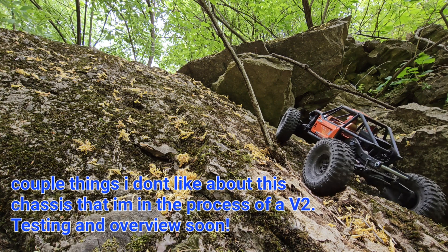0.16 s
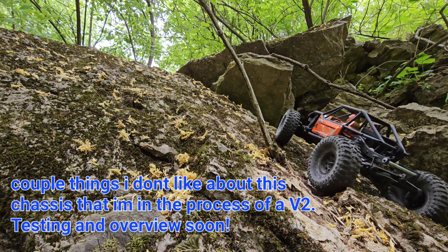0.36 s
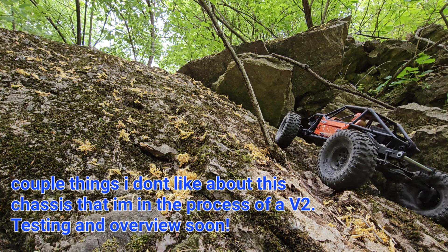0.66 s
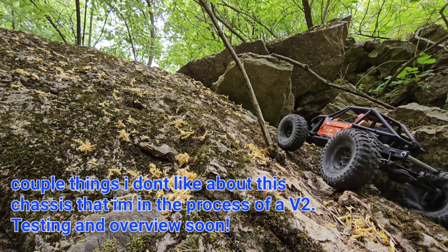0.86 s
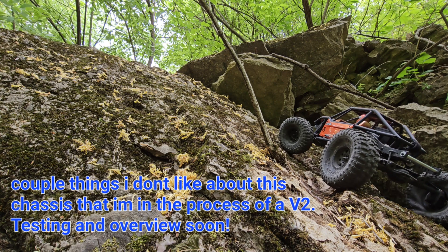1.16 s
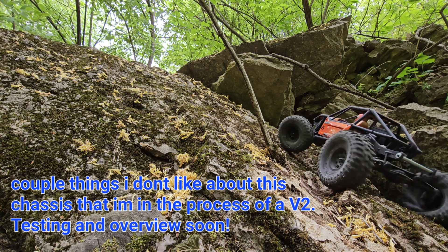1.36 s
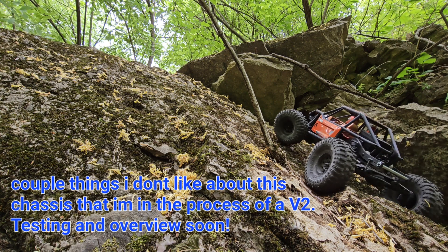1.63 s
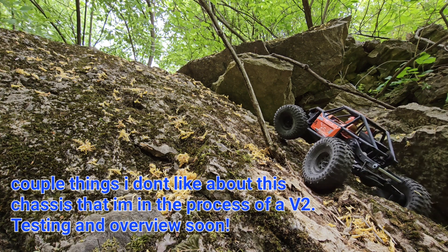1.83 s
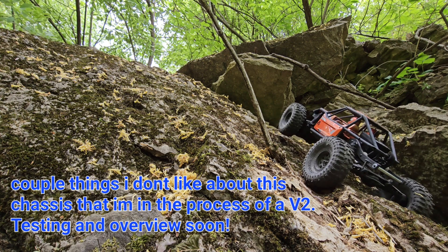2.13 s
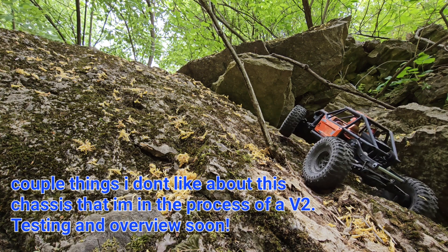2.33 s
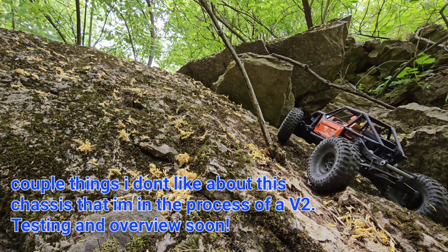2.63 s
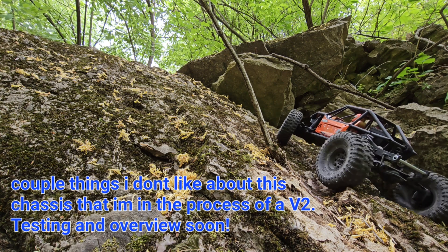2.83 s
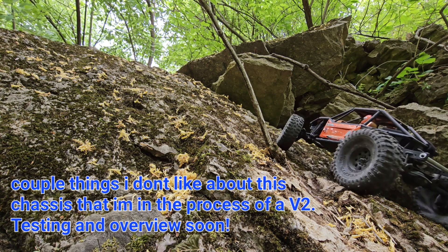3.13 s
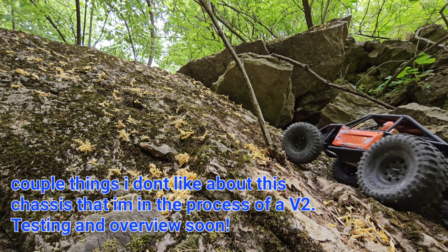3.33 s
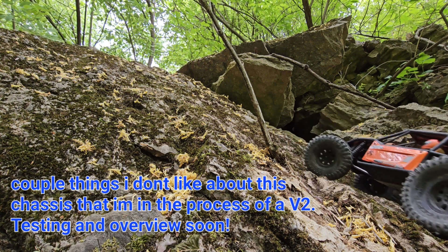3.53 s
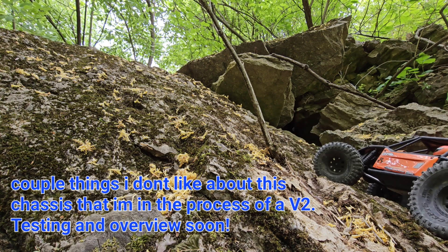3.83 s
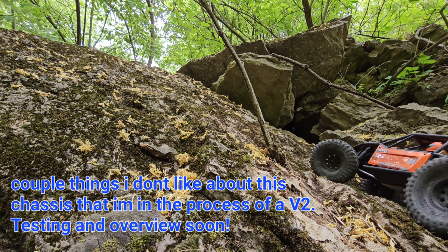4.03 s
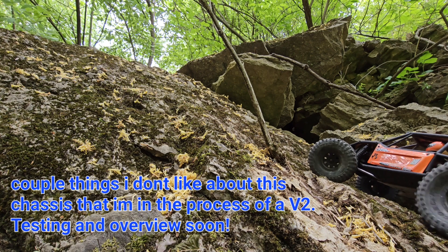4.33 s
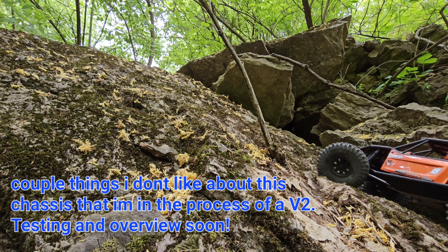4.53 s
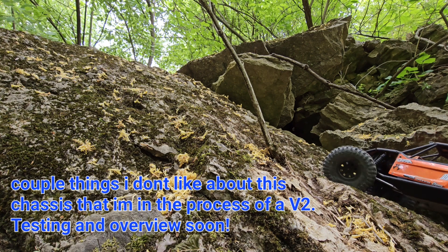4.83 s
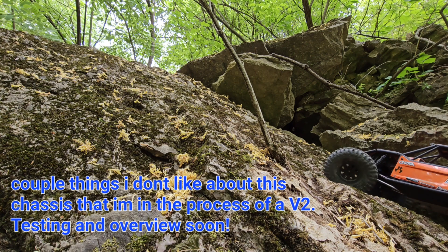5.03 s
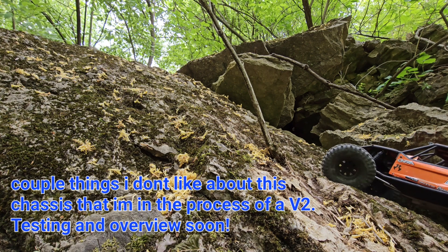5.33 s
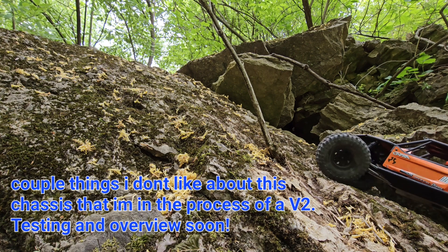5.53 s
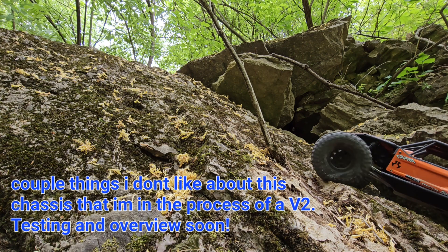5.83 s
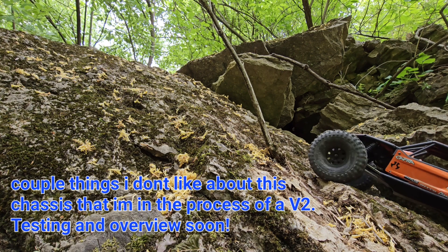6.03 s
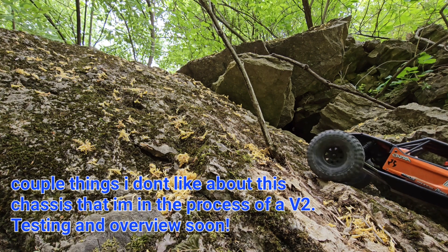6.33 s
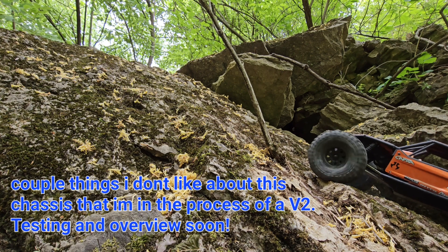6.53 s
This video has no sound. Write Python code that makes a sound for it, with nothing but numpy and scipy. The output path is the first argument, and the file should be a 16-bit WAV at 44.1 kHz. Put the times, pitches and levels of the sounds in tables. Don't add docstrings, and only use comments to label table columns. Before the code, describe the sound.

Outdoors under trees, close to a boulder, a stereo microphone hears sparse dry clicks and high zippy steering whirs from a toy truck over soft distant rumble. After about three seconds rubber lugs begin to slip and thud, dragging gritty scuffs and crisp leaf rustle. Bouts come faster and stronger, with tiny rubber squeaks, until the wheels break free, the small motor whines up and something snaps loudly.

```python
import sys
import numpy as np
from scipy import signal
from scipy.fft import rfft, irfft, next_fast_len
from scipy.io import wavfile
from scipy.ndimage import uniform_filter1d

SR = 44100
rng = np.random.default_rng(int(sys.argv[2]) if len(sys.argv) > 2 else 0)


def invert_db(level):
    return 10 ** (np.asarray(level, dtype=float) / 20)


def log_audio(samples):
    frames = np.atleast_2d(samples).T
    limited = np.clip(frames, -1, 1)
    pcm = np.round(limited * 32767).astype(np.int16)
    wavfile.write(sys.argv[1], SR, pcm)


N = 294058

# frequency in Hz, level in dB per Hz.
GRIT_COLOUR = [(600, -15.5), (800, -6), (950, -3.5), (1100, 1.5), (1300, -1), (1650, -2), (1900, -4.5),
               (2300, -7), (3000, -5.5), (4000, -7), (5500, -22.5), (8000, -38)]


def evened(x):
    return x / np.sqrt(np.mean(x ** 2) + 1e-20)


def read(points, hz):
    f, value = np.transpose(points)
    return np.interp(np.log(hz + 1), np.log(f + 1), value)


def follow(rows):
    s, *columns = np.transpose(rows)
    return [np.interp(np.arange(N) / SR, s, c) for c in columns]


def add(mix, s, sound):
    part = mix[round(s * SR):][:len(sound)]
    part += sound[:len(part)]


def colour(x, points, size=4096):
    log_gain = np.log(invert_db(read(points, abs(np.fft.fftfreq(size, 1 / SR)))))
    taps = np.fft.ifft(np.exp(np.conj(signal.hilbert(log_gain)))).real
    return signal.oaconvolve(x, taps[:size // 2])[:len(x)]


def resonate(x, hz, width_hz):
    turn = np.exp(2j * np.pi * np.cumsum(hz * np.ones(x.shape[-1])) / SR)
    r = np.exp(-np.pi * width_hz / SR)
    return 2 * (turn * signal.lfilter([1 - r], [1, -r], x * turn.conj())).real


def wobble(seconds, size=N):
    span = max(int(seconds * SR), 1)
    return evened(uniform_filter1d(uniform_filter1d(rng.standard_normal(size), span), span))


def partly_alike(a, b, same):
    return same * a + np.sqrt(1 - same ** 2) * b


def pair(points, same):
    size = next_fast_len(N)
    hz = np.fft.rfftfreq(size, 1 / SR)
    a, b = rfft(rng.standard_normal((2, size)))
    alike = np.clip(read(same, hz), 0, 1)
    spectra = np.array([a, partly_alike(a, b, alike)]) * invert_db(read(points, hz))
    return evened(irfft(spectra, size)[:, :N])


def grains(points, per_s, spread_db, smooth, same):
    size = invert_db(spread_db * np.minimum(rng.exponential(1, (2, N)), 4)) * rng.choice([-1., 1.], (2, N))
    clicks = evened(size * (rng.random((2, N)) < per_s / SR))
    a, b = clicks + smooth * rng.standard_normal((2, N))
    return evened(np.array([colour(a, points), colour(partly_alike(a, b, same), points)]))


def narrow_hisses(rows):
    out = np.zeros(N)
    for start, end, hz, width_hz, db in rows:
        size = round((end - start) * SR)
        hiss = resonate(resonate(rng.standard_normal(size), hz, width_hz), hz, width_hz)
        flicker = invert_db(db + 3 * wobble(0.005, size))
        add(out, start, flicker * evened(hiss) * signal.windows.tukey(size, .3))
    return out


def woods():
    # frequency in Hz, level in dB per Hz.
    air_colour = [(100, 0), (150, -6.5), (260, -9.5), (430, -16), (900, -19.5), (1200, -19), (1800, -24),
                  (3000, -22), (4500, -24), (5200, -30.5), (7300, -29), (9000, -41.5), (10200, -41),
                  (11500, -47), (15500, -32.5)]
    # frequency in Hz, likeness from 0 to 1.
    air_same = [(100, 0.73), (200, 1), (350, 0.31), (700, 0.075), (2000, 0.026)]
    # frequency in Hz, level in dB per Hz.
    rumble = [(15, -1), (30, -3), (40, 1), (50, -0.5), (80, 5), (99, 14.5), (112, 2.5), (135, -6),
              (220, -48)]
    # middle in seconds, length in seconds, level in dB.
    gust_rows = [(0.377, 0.14, -54.5), (0.743, 0.088, -55.5), (1.31, .5, -91), (2.31, 0.13, -54.5),
                 (2.59, 0.35, -66.5), (3.456, 0.81, -62), (4.776, 0.31, -68), (5.23, 0.14, -75),
                 (5.88, 0.14, -60), (6.41, 0.29, -63)]
    # time in seconds, hum in dB.
    hum_rows = [(0, -50), (.6, -55), (.78, -61.5), (.95, -58), (2.1, -57), (2.5, -51.5), (3.3, -54.5),
                (3.8, -57.5), (4.8, -66.5), (5.5, -56.5), (6.05, -60.5), (6.67, -57.5)]
    air_db, calm_db = -65, -61
    bump_s, bump_hz, bump_db, bump_width_s = 2.2625, 55.4, -38, 0.0077
    t = np.arange(N) / SR
    hum_db = follow(hum_rows)[0]
    gusts = invert_db(calm_db) + sum(invert_db(db) * np.exp(-(2 * (t - s) / length) ** 2) for s, length, db in gust_rows)
    low = pair(rumble, [(20, 1.0), (200, 0.95)]) * invert_db(np.array([[-2.2], [2.2]]))
    deep = signal.sosfiltfilt(signal.butter(4, 72, fs=SR, output="sos"), low)
    engine = evened(resonate(rng.standard_normal(N), 98 + 1.5 * wobble(.3), 2))
    hum = invert_db(hum_db) * (0.43 * evened(low - deep) + 0.41 * engine)
    air = invert_db(air_db + 0.89 * wobble(0.0085)) * pair(air_colour, air_same)
    puff_shape = np.exp(-((t - bump_s) / bump_width_s) ** 2 / 2)
    puff = invert_db(bump_db) * np.sin(2 * np.pi * bump_hz * (t - bump_s)) * puff_shape
    return air + puff + gusts * evened(deep) + hum


def electronics():
    # start in seconds, end in seconds, pitch in Hz, width in Hz, level in dB.
    idle = [(.76, 1.66, 7150, 190, -80), (.13, .45, 3000, 260, -76), (2.62, 3.05, 2980, 220, -77),
            (1.43, 1.6, 2950, 500, -63), (1.74, 1.9, 3250, 450, -73), (.04, .45, 7180, 150, -84),
            (.07, .19, 2150, 90, -81), (2.76, 3.0, 6450, 300, -82), (1.48, 1.6, 6200, 300, -71),
            (1.48, 1.62, 7500, 350, -70)]
    return narrow_hisses(idle)


def servo():
    # time in seconds, gear tooth rate in Hz.
    moves = [
        [(.805, 975), (.845, 2140), (.865, 2130), (.885, 1500)],
        [(.905, 1050), (.953, 1800), (.978, 1790), (1.025, 1450), (1.06, 1384), (1.11, 900)],
        [(1.43, 890), (1.62, 900)],
        [(2.02, 1050), (2.045, 1550), (2.065, 2200), (2.085, 2450), (2.11, 2330), (2.143, 2370)],
        [(2.13, 1560), (2.15, 1640), (2.178, 2150), (2.19, 2130), (2.21, 1500)],
        [(2.25, 900), (2.282, 1095), (2.32, 1030), (2.35, 1040)],
        [(2.345, 1150), (2.38, 1650), (2.395, 1660), (2.415, 1560), (2.46, 1050)],
        [(3.32, 2010), (3.357, 2320)],
        [(3.35, 1650), (3.375, 2350), (3.39, 2620)],
        [(3.362, 1050), (3.383, 1450), (3.402, 1850), (3.425, 2100), (3.45, 2210), (3.465, 2170), (3.49, 1950)],
        [(5.955, 1700), (5.985, 1610), (6.015, 1420), (6.068, 1310)],
    ]
    # whine in dB, brush hiss in dB, boost of odd multiples in dB
    # (which gear carries the load), extra bite while speeding up in dB.
    loads = [(-61.5, -57, 2, -2), (-62, -61, 0, 2), (-92, -61, 0, 0), (-59, -54, -5, 0), (-57, -55, -7, 0),
             (-66, -63, -1, 0), (-62.5, -62, -2, 2), (-59, -60, -11, 0), (-56, -63, 6, 0),
             (-56, -57, -20, 9), (-57, -61, 0, 0)]
    # frequency in Hz, level in dB.
    teeth = [(1500, -22), (2200, -3), (3000, 3), (4800, 0), (5400, -1), (5900, -11), (6500, -5), (6900, -6),
             (7300, 5), (7750, -5), (8200, 1), (8800, 0), (9300, -24), (11500, -40)]
    # frequency in Hz, level in dB per Hz.
    case = [(1500, -22), (2600, -11), (3400, -4), (4700, 0), (5200, -8), (5700, -30), (6400, -9),
            (7300, -3), (8300, -2), (9300, -6), (10200, -24), (11500, -17), (15800, -19)]
    # pitch in Hz, width in Hz, level in dB.
    case_rings = [(7300, 300, 0), (8150, 250, 1), (9200, 200, -2)]
    edge_s, coast_s = .02, .05
    out = np.zeros(N)
    for rows, (whine_db, hiss_db, odd_db, push_db) in zip(moves, loads):
        s, hz = np.transpose(rows)
        t = np.arange(s[0], s[-1], 1 / SR)
        hz = uniform_filter1d(np.interp(t, s, hz), 500, mode="nearest")
        speed = hz / hz.max()

        turns = np.cumsum(hz * (1 + .011 * wobble(.0025, len(t)))) / SR
        stack = np.zeros(len(t))
        for k in range(1, 9):
            unsteady_db = (2.5 + .5 * k) * wobble(.005, len(t))
            level_db = read(teeth, k * hz) + odd_db * (k % 2) - 1.6 * k + unsteady_db
            stack += invert_db(level_db) * np.sin(2 * np.pi * k * turns)
        edges = np.clip(np.minimum(t - s[0], s[-1] - t) / edge_s, 0, 1)
        push = invert_db(push_db * np.tanh(np.gradient(np.log(hz)) * SR / 8))
        add(out, s[0], edges * invert_db(whine_db + 1) * speed ** 1.2 * evened(stack) * push)

        hiss = colour(rng.standard_normal(len(t) + round(coast_s * SR)), case)
        hiss = hiss + sum(invert_db(db) * resonate(hiss, ring_hz, width_hz) for ring_hz, width_hz, db in case_rings)
        start_up = speed * np.clip((t - s[0] + .005) / .035, 0, 1)
        after = np.arange(len(hiss) - len(t)) / SR
        coast = np.r_[start_up, speed[-1] * invert_db(-30 * after / coast_s)]
        roughness = invert_db(hiss_db - 5.0 + 0.65 * wobble(0.0021, len(hiss)))
        add(out, s[0], roughness * uniform_filter1d(coast, 400) ** 1.8 * evened(hiss))
    return out


def drive_motor():
    # time in seconds, pitch in Hz, level in dB,
    # level of the second multiple in dB.
    bursts = [
        [(6.33, 824, -66, -60), (6.35, 900, -62, -48), (6.39, 1180, -31, -49), (6.42, 1290, -50, -62),
         (6.45, 1383, -28, -43), (6.47, 1470, -46, -55), (6.49, 1530, -75, -70)],
        [(6.485, 750, -67, -65), (6.51, 980, -26, -63), (6.535, 1090, -43, -63), (6.55, 1110, -62, -65)],
        [(6.55, 920, -65, -60), (6.57, 1030, -44, -54), (6.605, 1205, -31, -44), (6.625, 1310, -65, -56)],
    ]
    out = np.zeros(N)
    for rows in bursts:
        s, *columns = np.transpose(rows)
        t = np.arange(s[0], s[-1], 1 / SR)
        hz, db, second_db = [np.interp(t, s, c) for c in columns]
        noise = rng.standard_normal(len(t))
        whine = invert_db(db) * evened(resonate(noise, hz, 47))
        add(out, s[0], whine + invert_db(second_db) * evened(resonate(noise, 2 * hz, 90)))
    return out


def squeaks():
    # start in seconds, end in seconds, pitch in Hz, width in Hz, level in dB.
    squeak_rows = [(3.625, 3.675, 1730, 340, -53), (3.7, 3.728, 1870, 300, -57),
                   (3.545, 3.565, 1700, 250, -77), (5.325, 5.36, 2050, 340, -48.5),
                   (5.79, 5.83, 2350, 100, -54), (1.95, 1.975, 5300, 150, -77),
                   (1.96, 1.995, 4900, 150, -83), (3.115, 3.17, 7000, 150, -74),
                   (6.36, 6.475, 11300, 1700, -49), (6.38, 6.475, 12700, 500, -53.5),
                   (6.57, 6.625, 11500, 650, -56), (6.57, 6.62, 12700, 500, -56),
                   (6.4, 6.45, 546, 160, -45), (6.56, 6.62, 562, 180, -36.5), (6.29, 6.315, 750, 380, -46)]
    return narrow_hisses(squeak_rows)


def snaps():
    # time in seconds, peak in dB, brightness in dB.
    snap_rows = [(0.097, -40, -19), (.11, -37, -22), (.21, -43, -15), (0.248, -30.5, -33),
                 (0.272, -40, -25), (0.442, -39, -37), (0.4783, -39, -39), (0.5045, -38, -34),
                 (0.563, -30, -31), (.572, -36, -15), (1.2558, -44, -40), (1.422, -37, -20),
                 (1.4505, -60, -4), (1.877, -51, 10), (1.95, -38.5, -18), (2.139, -28, -18),
                 (2.5336, -52, -27), (2.644, -36.5, -29), (2.709, -43, -25), (2.81, -43, -25),
                 (2.855, -39.5, -30), (2.882, -42, -22), (2.964, -56, -23), (3.088, -56, -23),
                 (2.9275, -33.5, -38), (3.038, -41, -35), (3.7075, -46, -20), (3.742, -27, -11),
                 (3.9064, -65, -25), (4.8595, -31, -25), (4.9725, -28, -25), (5.3288, -25, -1),
                 (5.6594, -24, -9), (5.6894, -31, 10), (5.8755, -27, -27), (6.106, -27, -15),
                 (6.301, -29, -24), (6.4054, -29, 5), (6.5483, -3, -5.5)]
    # frequency in Hz, level in dB.
    wood_colour = [(250, -41), (900, -20), (3000, 6), (4800, 0), (6500, 2), (16000, -51.5)]
    # frequency in Hz, level in dB per Hz.
    fizz_colour = [(3000, -24), (5500, -3), (8000, -2), (10000, -7), (12000, -4), (16000, -6)]
    # pitch in Hz, width in Hz, level in dB.
    shell_rings = [(2960, 150, 0), (3600, 150, -1), (4280, 180, -2), (5450, 140, -5), (6250, 160, -5),
                   (7500, 200, -6), (8200, 200, -6)]
    stands_until_s = 3.2
    out, t = np.zeros(N), np.arange(1500) / SR
    fade = np.minimum(t / .0018, 1) * (invert_db(-60 * t / .018) + .12 * invert_db(-60 * t / .05))
    for s, db, bright_db in snap_rows:
        burst = rng.standard_normal(len(t)) * fade
        wood, fizz = colour(burst, wood_colour), colour(burst, fizz_colour)
        if s < stands_until_s:
            fizz = colour(fizz, [(8500, 0), (10500, -12)])
            shell = sum(invert_db(ring_db + 3 * rng.standard_normal()) * resonate(burst, hz, width_hz)
                        for hz, width_hz, ring_db in shell_rings)
            wood = .5 * evened(wood) + .3 * evened(colour(burst, GRIT_COLOUR)) + evened(shell)
        crack = wood / abs(wood).max() + invert_db(bright_db + 1.5) * fizz / abs(fizz).max()
        add(out, s + 0.00081, invert_db(db - 14.0) * crack)
    return out


def layers(db, dry_db):
    over_db = db + 50
    grit_db = -53.5 + 0.78 * over_db + 0.34 * dry_db
    leaf_db = -64.5 + 0.99 * over_db + dry_db
    return invert_db(2 * np.array([db, grit_db, leaf_db]))


def tread():
    # start in seconds, length in seconds, effort in dB, dryness of the ground in dB.
    bouts = [(0.36, 0.063, -75, -4), (0.4, 0.08, -67, -2), (0.785, 0.3, -71, -23), (1.415, 0.14, -56.5, 4),
             (1.693, 0.098, -70.5, -4), (1.761, 0.18, -64.5, -3), (2.087, 0.12, -72.5, -14),
             (2.362, .1, -97, 13), (3.173, 0.2, -65, 4.5), (3.345, 0.3, -49, -25),
             (3.347, 0.13, -69.5, 25.5), (3.48, 0.13, -53.5, 3), (3.618, 0.036, -49.5, 2.5),
             (3.681, 0.061, -65.5, 13), (3.811, 0.021, -53, -3), (3.899, 0.016, -56.5, 3.5),
             (4.033, 0.06, -63.5, -8), (4.08, .03, -53, 1.5), (4.103, 0.067, -50, 2.5),
             (4.188, 0.18, -52.5, -0.5), (4.328, 0.33, -49, -0.5), (4.665, 0.095, -47, -3.5),
             (4.802, 0.056, -47.5, -4.5), (4.944, 0.042, -46, -5.5), (5.05, 0.37, -52, 0.5),
             (5.354, 0.29, -49, 1.5), (5.619, 0.078, -43.5, 7.5), (5.727, 0.17, -46, 2),
             (5.895, 0.09, -46.5, 5), (6.053, 0.23, -50, -0.5), (6.165, 0.099, -47, 1),
             (6.291, 0.092, -42.5, 6), (6.38, 0.13, -38, 4.5), (6.5, 0.12, -37.5, 2), (6.64, .03, -43, -3)]
    # time in seconds, effort in dB, dryness in dB.
    creep = [(0, -114, 19), (1.4, -102, -34), (2.5, -76.5, -13), (3.1, -74.5, 3), (4.0, -68, 2.5),
             (5.0, -56, 0), (6.05, -62.5, 7.5), (6.67, -52, 15)]
    let_go_db_per_s = 319
    t = np.arange(3000 + SR // 2) / SR
    power = layers(*follow(creep)).T.copy()
    for s, length, db, dry_db in bouts:
        bite = np.clip(t / (0.018 + 0.15 * length), 1e-3, 1)
        let_go_db = let_go_db_per_s * np.maximum(t - length, 0)
        add(power, s, layers(db + 20 * np.log10(bite) - let_go_db, dry_db).T)
    return 10 * np.log10(power.T)


def lug_knock(t, hz, crack_colour):
    pull = np.maximum(t - .0009, 0)
    snap_back = np.sin(2 * np.pi * 430 * t + .8) * (.25 + t / .0009) * np.exp(-t / .0012)
    crack = (rng.standard_normal(len(t)) + 4 * (t == 0)) * np.exp(-t / .0005)
    knock = snap_back + .5 * colour(crack, crack_colour)
    knock += .3 * np.sin(2 * np.pi * 570 * t) * invert_db(-60 * t / .03)
    knock += 0.25 * np.sin(2 * np.pi * 1700 * t) * np.exp(-t / 0.0021)
    knock -= 0.55 * np.sin(2 * np.pi * hz * pull) * invert_db(-60 * pull / 0.028)
    return knock / abs(knock).max()


def tyres():
    # time in seconds, peak in dB, pitch in Hz, scuff length in seconds.
    slips = [(0.4225, -66, 910, .005), (.44, -60, 800, .005), (0.4766, -52, 800, .005),
             (1.475, -43.5, 537, 0.088), (2.532, -48.5, 640, 0.11), (2.741, -49.5, 246, 0.0051),
             (3.275, -38, 627, 0.0076), (3.34, -41, 533, 0.034), (3.509, -37.5, 507, 0.017),
             (3.636, -41.5, 624, 0.033), (3.702, -38, 280, 0.079), (3.742, -40, 200, 0.051),
             (3.828, -60, 342, 0.058), (3.853, -41.5, 684, 0.013), (4.1, -38, 197, 0.26),
             (4.148, -41, 250, 0.054), (4.818, -35.5, 265, 0.058), (4.836, -42, 298, 0.034),
             (4.859, -27.5, 302, 0.021), (4.8964, -29, 570, 0.022), (4.9727, -28.5, 275, 0.021),
             (5, -33.5, 560, 0.012), (5.1665, -35.5, 230, 0.02), (5.4207, -28, 282, 0.03),
             (5.5595, -29, 564, 0.058), (5.7712, -31.5, 457, 0.0056), (5.8737, -32.5, 503, 0.021),
             (5.963, -34.5, 249, 0.022), (6.005, -35, 367, 0.025), (6.0833, -36, 279, 0.051),
             (6.5301, -26.5, 242, 0.024), (6.592, -29.5, 275, 0.077), (6.6035, -28, 236, 0.027)]
    # time in seconds, peak in dB.
    nicks = [(1.452, -46.5), (3.32, -43.5), (3.5237, -56), (3.5465, -50), (3.5608, -41), (3.5674, -42),
             (3.657, -41), (4.101, -48), (4.123, -46), (4.156, -42), (4.236, -40), (4.31, -59),
             (4.3728, -39), (4.3847, -41), (4.457, -37.5), (4.5254, -44), (4.552, -47), (4.572, -47),
             (4.6308, -38.5), (4.7232, -38), (4.765, -43), (5.0165, -39), (5.104, -39), (5.1301, -47),
             (5.1927, -43), (5.308, -41.5), (5.358, -46), (5.4604, -43), (5.5, -39), (5.6492, -40),
             (5.6677, -37), (5.6798, -34), (5.7025, -33.5), (5.817, -33), (5.9165, -36), (6.1633, -46),
             (6.1782, -39.5), (6.191, -51), (6.23, -34), (6.302, -38), (6.322, -43), (6.338, -41),
             (6.38, -37), (6.4033, -34), (6.411, -32), (6.424, -32), (6.4322, -40), (6.449, -31),
             (6.459, -25), (6.465, -41), (6.483, -34), (6.542, -30), (6.57, -32), (6.5789, -38),
             (6.6162, -37), (6.6571, -32.5)]
    # frequency in Hz, level in dB per Hz.
    lug_colour = [(70, -22.5), (170, -0.5), (260, 1), (360, -5.5), (560, 2), (760, -1), (950, -12.5),
                  (1500, -41.5)]
    # frequency in Hz, level in dB per Hz.
    leaf_colour = [(2500, -5.5), (4500, 3.5), (7000, 3), (9500, -2), (10600, -9.5), (11500, -4),
                   (12700, -7.5), (14000, -2), (16000, -8.5)]
    # frequency in Hz, level in dB.
    crack_colour = [(500, -20), (1000, 0), (3500, 0), (5500, -10), (9000, -45)]
    lug_db, grit_db, leaf_db = tread()
    judder = wobble(0.009)
    drag, out = np.ones(N), np.zeros(N)
    t = np.arange(6000) / SR
    loudness = invert_db(lug_db)
    booms = rng.choice((250, 577), len(nicks)) * rng.uniform(0.85, 1.11, len(nicks))
    lesser = [(s, db, hz, 0.042) for (s, db), hz in zip(nicks, booms)]
    for s, db, hz, scuff_s in list(slips) + lesser:
        scuff = np.minimum(t / .004, 1) * invert_db(db - 60 * t / max(scuff_s, .005))
        add(drag, s + .003, 0.11 * scuff / loudness[round(s * SR)])
        add(out, s + .0022, invert_db(db + 2.5) * lug_knock(t, hz, crack_colour))

    lugs = grains(lug_colour, per_s=350, spread_db=4.0, smooth=0.74, same=1.0)
    out = out + invert_db(lug_db + 0.5 + 1.2 * judder) * drag * lugs

    grit = grains(GRIT_COLOUR, per_s=1100, spread_db=3.6, smooth=0.75, same=0.65)
    hollow = 1.3 * resonate(grit, 2300 * (1 + .06 * wobble(.05)), 220)
    hollow += .4 * resonate(grit, 1400 * (1 + .1 * wobble(.04)), 150)
    pressed = np.clip((grit_db + 62) / 14, .1, 1.3)
    out += invert_db(grit_db + 3.0 + 0.89 * judder) * drag ** 1.58 * (grit + pressed * hollow)

    leaves = grains(leaf_colour, per_s=2500, spread_db=2.3, smooth=1.2, same=.2)
    out += invert_db(leaf_db + 5.5 + 1.15 * judder) * drag ** 0.35 * leaves
    return out


def ports(x, lag, right_db, wet_db, t60):
    # frequency in Hz, level in dB.
    shadow = [(80, -1.5), (200, -2), (700, -2.5), (1300, -2.5), (2400, -4.5), (4400, -4), (8000, -1.5),
              (10500, 1.5), (12000, -4), (15500, -0.5)]
    left, right = x * np.ones((2, 1))
    late = np.r_[np.zeros(lag), colour(right, shadow)][:N]
    both = np.array([left, late * invert_db(right_db)])
    t = np.arange(3800) / SR
    out, turn = both.copy(), np.pi * 9.5 * np.arange(N) / SR
    for k in range(3):
        taps = rng.standard_normal((2, len(t))) * invert_db(-60 * t / t60) * (t > .002)
        share = np.sqrt(2 / 3) * np.cos(turn + k * np.pi / 3)
        tail = signal.oaconvolve(both * share, taps / np.linalg.norm(taps[0]), axes=1)
        out += invert_db(wet_db) * tail[:, :N]
    return out


def scene():
    truck = tyres() + snaps() + squeaks() + drive_motor() + electronics()
    wheels = ports(truck, lag=17, right_db=.8, wet_db=-11.5, t60=.1)
    steering = ports(servo(), lag=8, right_db=4, wet_db=-11, t60=.08)
    return invert_db(-2.0) * wheels + invert_db(2.5) * steering + woods()


def low_pass(x):
    return signal.sosfilt(signal.butter(12, 16460, fs=SR, output="sos"), x)


def record(dry):
    # pitch in Hz, width in Hz, level in dB.
    cavity = [(11050, 300, 6), (11550, 500, 10), (12650, 450, 10), (15550, 300, 3)]
    left = dry[0] + sum(invert_db(db) * resonate(dry[0], hz, width_hz) for hz, width_hz, db in cavity)
    edge = signal.firwin(511, 15740, window=("kaiser", 9), fs=SR)
    mix = signal.oaconvolve(np.array([left, dry[1]]), edge[None], "same")
    return low_pass(mix)


dry = scene()
out = record(dry)
log_audio(out)
```